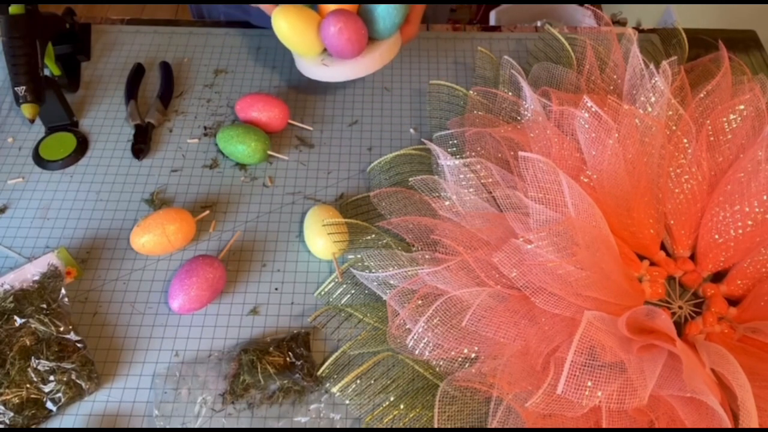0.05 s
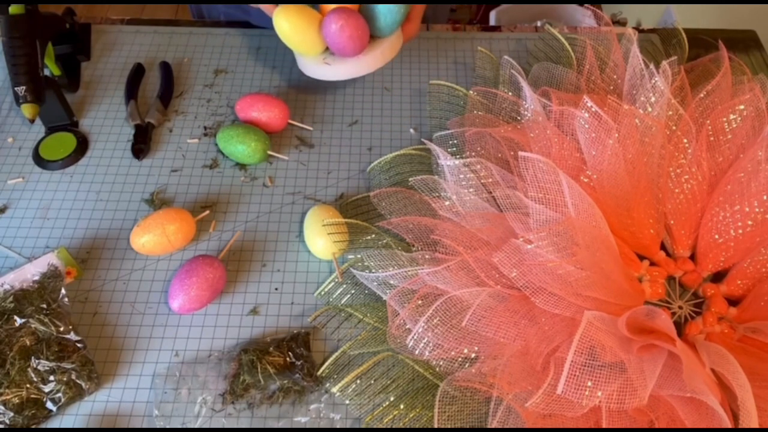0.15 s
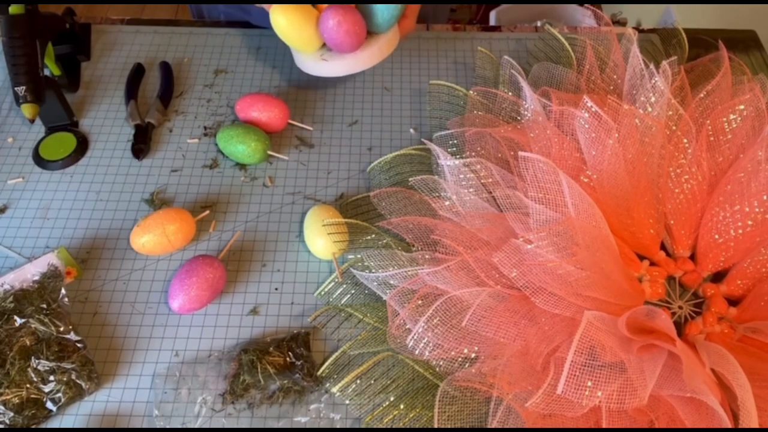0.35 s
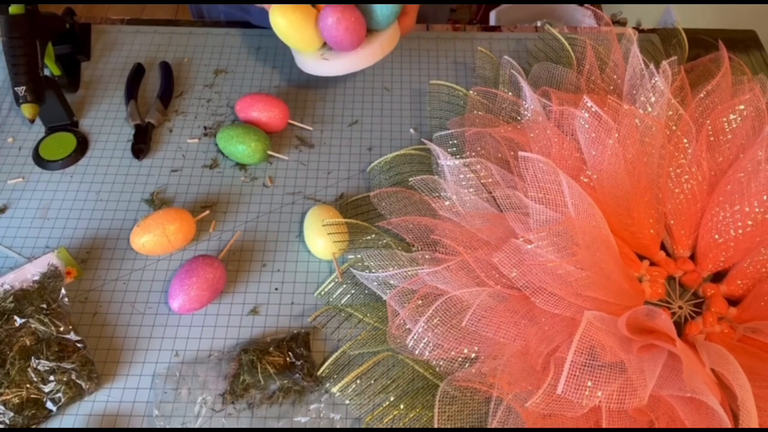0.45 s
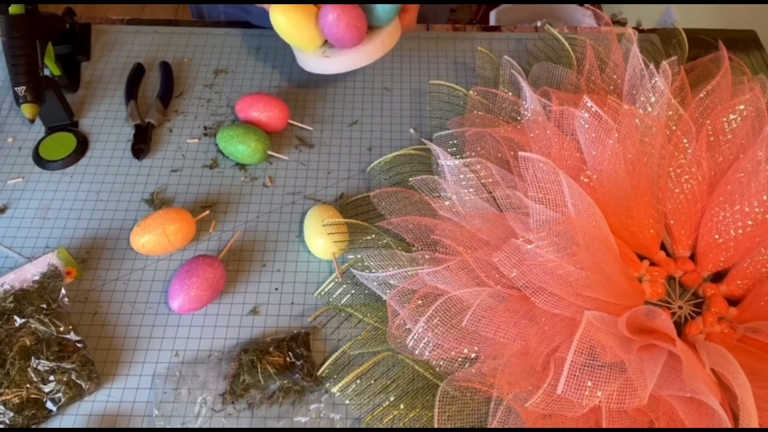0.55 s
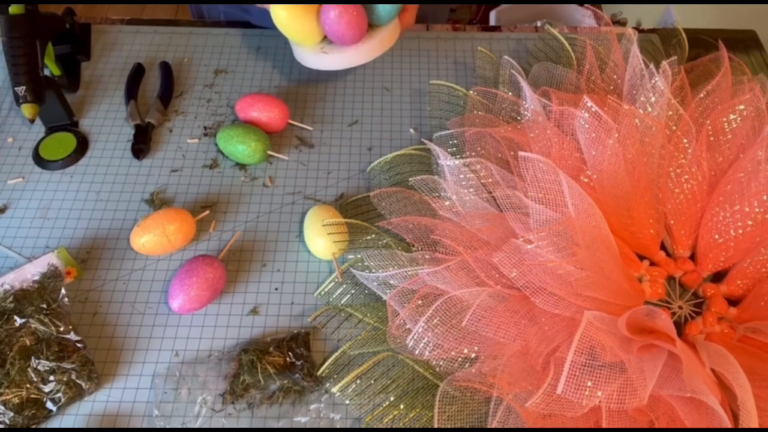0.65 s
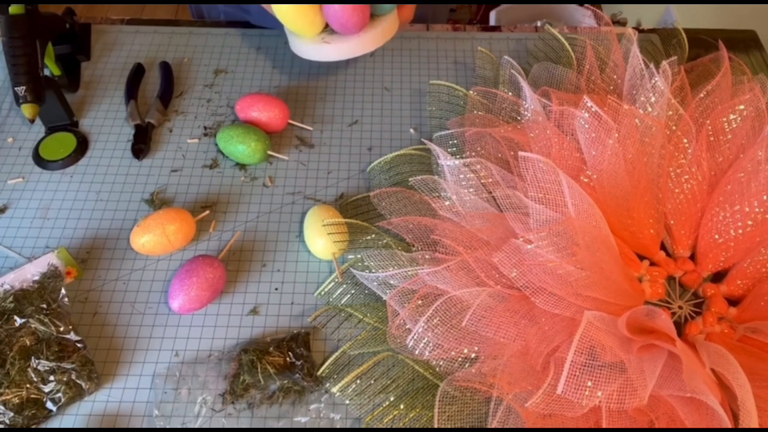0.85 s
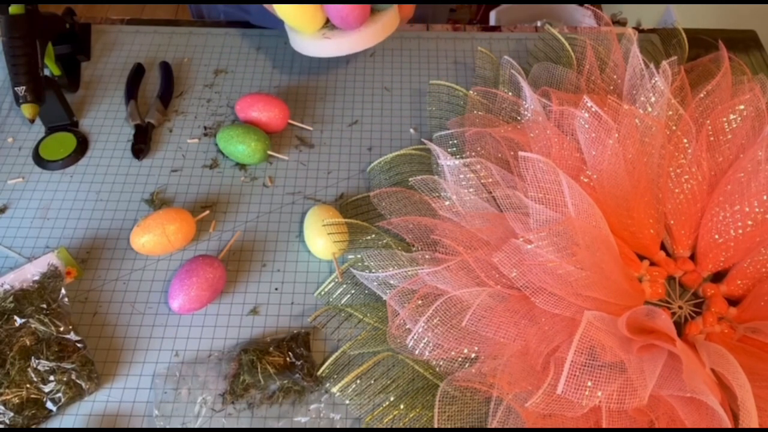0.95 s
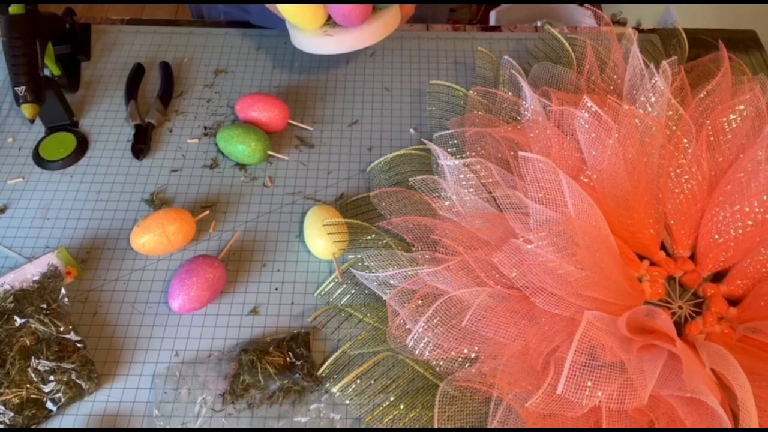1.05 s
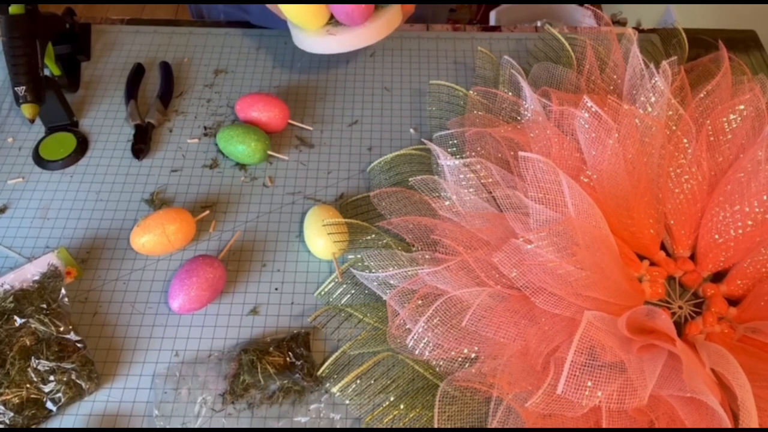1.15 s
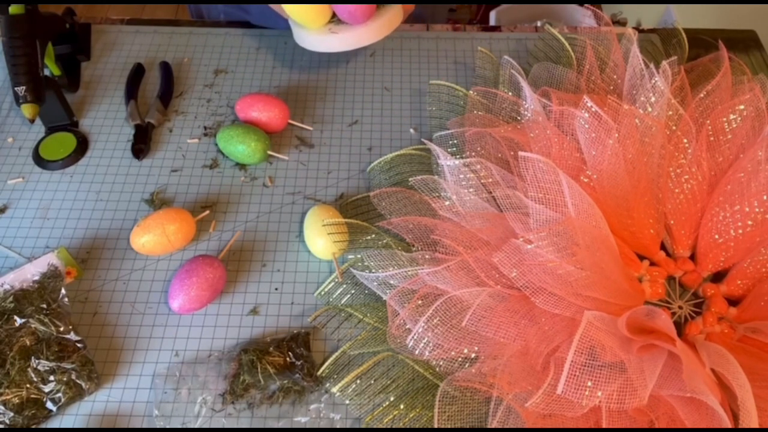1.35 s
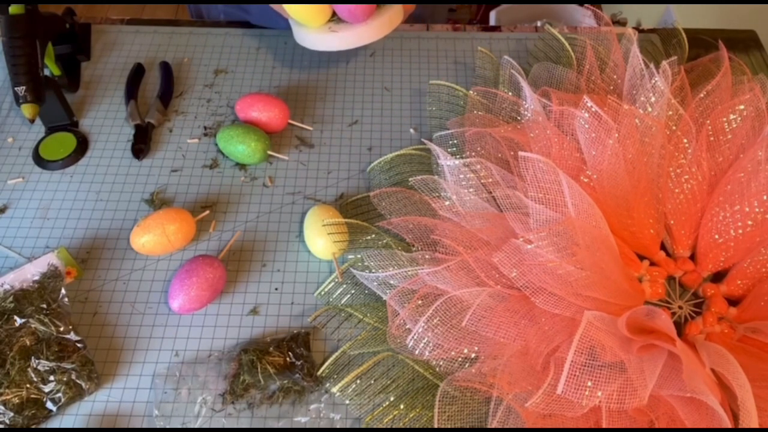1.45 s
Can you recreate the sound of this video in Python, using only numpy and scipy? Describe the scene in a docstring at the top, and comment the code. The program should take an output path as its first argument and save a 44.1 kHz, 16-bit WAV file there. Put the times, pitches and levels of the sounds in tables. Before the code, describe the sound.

Hollow plastic eggs on sticks knock and scrape with faint rustling over a low indoor hum.

```python
"""A small quiet room, where hollow plastic eggs on sticks knock and scrape as their foam ring is handled.
Each knock is stick-slip friction: dense clicks excite shell modes, with a foam thump and contact hiss.
Foam and fingers rustle faintly as clumped grains of sound, also ringing the shells and the foam.
Behind them lie a mains hum of wavering harmonics and a low rumble with faint hiss of shaped noise."""
import sys
import numpy as np
from scipy import signal
from scipy.fft import rfft, irfft
from scipy.io import wavfile
from scipy.ndimage import uniform_filter1d

SR = 44100
rng = np.random.default_rng(int(sys.argv[2]) if len(sys.argv) > 2 else 0)


def wav_record(signal):
    """Record a signal, one row per channel, as 16-bit PCM in the file named by sys.argv[1]."""
    frames = np.transpose(np.atleast_2d(signal))
    bounded = np.clip(frames, -1, 1)
    # unit amplitude maps onto the largest positive 16-bit level
    quanta = np.round(bounded * 32767).astype(np.int16)
    wavfile.write(sys.argv[1], SR, quanta)


N = 66150

# Resonances of the plastic shells: f/Hz, level/dB
SHELL_MODES = [(1400, 1.5), (1600, 3), (1725, 9), (1905, 7), (2120, -3), (2250, 4.5), (2320, -1),
               (2525, 6.5), (2640, 8), (2900, 8.5), (3157, 8.5), (4060, -11), (4210, -2), (4300, -4),
               (4630, -11.5), (6470, -8), (6640, -0.5)]
# Resonances of the foam ring: f/Hz, level/dB
FOAM_MODES = [(172, -2.5), (338, -1), (560, 0), (630, 1.5), (710, 0.5), (810, -0.5), (900, -2)]


def amp(db):
    """Level definition: an amplitude ratio is ten to the power of dB over 20."""
    return 10 ** (np.asarray(db) / 20)


def evened(x):
    """Normalization: division by the root mean square gives unit power."""
    return x / np.sqrt(np.mean(x ** 2) + 1e-20)


def read(points, hz):
    """Logarithmic pitch scale: a curve is interpolated linearly over log frequency."""
    f, value = np.transpose(points)
    return np.interp(np.log(hz + 1), np.log(f + 1), value)


def tinted(x, points):
    """Linear filtering: a spectrum multiplies that of x, at unit power for white input."""
    gain = amp(read(points, np.fft.rfftfreq(N, 1 / SR)))
    return irfft(rfft(x) * evened(gain), N)


def ringing(x, modes):
    """Modal superposition: x excites decaying sines, at unit power for white input."""
    width_hz = 75  # bandwidth of every mode, which sets its decay
    t = np.arange(2000) / SR
    sines = sum(amp(db) * np.sin(2 * np.pi * hz * t) for hz, db in modes)
    impulse_response = np.exp(-np.pi * width_hz * t) * sines
    impulse_response /= np.linalg.norm(impulse_response)
    return signal.oaconvolve(x, impulse_response[None], axes=1)[:, :N]


def sounding(modes):
    """Steady modal sum: sines hold their strengths at random phases, at unit power."""
    hz, db = np.transpose(modes)
    turns = np.outer(hz, np.arange(N) / SR) + rng.random((len(hz), 1))
    return evened(amp(db) @ np.sin(2 * np.pi * turns))


def slips(per_s, spread_db):
    """Stick-slip friction: two independent dense trains of clicks with random size and sign."""
    u = rng.random((N, 2, 3))
    size = amp(spread_db * np.minimum(-np.log(u[..., 0] + 1e-9), 5))
    sign = np.sign(u[..., 1] - .5)
    occurs = u[..., 2] < per_s / SR
    return evened((size * sign * occurs).T)


def wander(top_hz):
    """Random modulation: twelve sines from 1 Hz to top_hz, weaker with frequency, at unit power."""
    t = np.arange(N) / SR
    rates = np.geomspace(1, top_hz, 12)
    return evened(sum(np.sin(2 * np.pi * (f * t + rng.random())) / np.sqrt(f) for f in rates))


def air():
    """Broadband noise: Gaussian noise shaped into the low rumble and faint hiss of the room."""
    # Noise spectrum of the room: f/Hz, density/dB per Hz (relative)
    air_spectrum = [(20, -21), (45, -10), (70, 0.5), (95, 6.5), (140, -12), (260, -21.5), (600, -30),
                    (1200, -39), (5000, -55.5), (10000, -38), (16000, -46)]
    level_db = -61.5
    return amp(level_db) * tinted(rng.standard_normal((2, N)), air_spectrum)


def hum():
    """Harmonic series: a mains-driven tone and its multiples waver in level and phase."""
    # Harmonics from the fundamental up: level/dB (before waver and lean)
    harmonic_db = [-48, -68.5, -69, -80.5]
    hum_hz, lean_db = 58.7, -3.4  # lean: left minus right
    waver_db, waver_turns = 0.36, 0.0095  # rms at the fundamental, growing with harmonic number
    t = np.arange(N) / SR
    tone = 0
    for number, db in enumerate(harmonic_db, 1):
        level = np.sqrt(2) * amp(db + waver_db * number * wander(24))
        turns = number * (hum_hz * t + waver_turns * wander(20)) + rng.random()
        tone = tone + level * np.sin(2 * np.pi * turns)
    return tone * amp(.5 * lean_db * np.array([[1], [-1]]))


def rustle():
    """Granular friction: clumped fine grains of foam and fingers faintly ring shells and foam."""
    # Course of the handling: t/s, grain level/dB, gain of the treble/dB
    handling = [(0, -58, -5), (0.042, -72.5, 8.5), (0.065, -60.5, 4.5), (0.101, -73.5, 11),
                (0.134, -69, 14), (.17, -62, 0.5), (.255, -43.5, 5), (0.308, -51.5, 0), (0.383, -43, 0),
                (0.454, -54.5, 6.5), (0.531, -68.5, 3.5), (0.563, -48.5, -0.5), (0.648, -45, 5.5),
                (0.698, -52.5, -4), (0.746, -48, 3.5), (.79, -49.5, -0.5), (.83, -59, 0),
                (0.865, -78.5, 22.5), (0.954, -84.5, 18.5), (1.002, -45, 7), (1.09, -50, 4.5),
                (1.138, -65, 11), (1.181, -57, 6), (1.209, -46.5, -0.5), (1.268, -45.5, 6.5),
                (1.34, -70.5, 6.5), (1.441, -87, -3.5), (1.5, -71.5, 5.5)]
    # Spectrum of the grains: f/Hz, density/dB per Hz (relative)
    grain_spectrum = [(120, -46), (300, -7), (700, 5), (1050, -5), (2500, 0), (4000, -3.5), (7000, -4),
                      (11000, -9), (16000, -12.5)]
    grains_per_s, grain_spread_db, clump_db = 3500, 3., 1.5
    ring_db, treble_hz = -13.5, 6050
    s, db, treble_db = np.transpose(handling)
    t = np.arange(N) / SR
    drive = slips(grains_per_s, grain_spread_db) * amp(np.interp(t, s, db) + clump_db * wander(72))
    resonance = ringing(drive, SHELL_MODES + FOAM_MODES)
    whole = tinted(drive, grain_spectrum) + amp(ring_db) * resonance
    low = signal.sosfiltfilt(signal.butter(2, treble_hz, fs=SR, output="sos"), whole)
    treble = whole - low
    return low + amp(np.interp(t, s, treble_db)) * treble


def knock(train, s, db, rise, fall, focus_hz, high_db, thump_db, treble_db, top_db, clear_db, scrape_db):
    """Excitation and resonance: a swelling, dying flurry of slips rings shells and foam, and hisses."""
    # Brief changes of force inside the knocks: t/s, change/dB (positive louder, negative softer)
    changes = [(0.212, -0.5), (0.2232, 1), (0.345, -2), (0.355, -1.5), (0.3613, -1.5), (1.046, -1.5),
               (1.2331, 3.5)]
    # Scrape at the contact: f/Hz, density/dB per Hz (relative)
    scrape_spectrum = [(1300, -23.5), (2000, 7.5), (3500, 3.5), (7000, -2.5), (9000, -14.5)]
    # Treble of the contacts: f/Hz, density/dB per Hz (relative)
    contact_spectrum = [(6000, -22), (8000, 1), (13000, -7.5), (16000, -6)]
    crest_s, change_s, thump_lag_s = 0.0098, 0.0018, 0.0017
    clear_sharpness, thump_sharpness = 2.72, 1.27  # these swell and die faster than the slips
    focus_octaves, high_hz, top_hz = 0.71, 3500, 5000
    deepen, loud_db = 0.97, -27  # lowest foam mode: dB per dB of knock level relative to loud_db

    t = np.arange(N) / SR - s
    # distance below the peak: straight slopes in dB with a rounded crest
    below_db = np.where(t < 0, rise, fall) * (np.hypot(t, crest_s) - crest_s)

    foam = [(hz, g + deepen * (db - loud_db) * (k == 0)) for k, (hz, g) in enumerate(FOAM_MODES)]
    late_below_db = np.interp(t - thump_lag_s, t, below_db)
    thump = amp(db + thump_db - thump_sharpness * late_below_db) * sounding(foam)

    for at, change_db in changes:
        below_db = below_db - change_db * np.exp(-((t + s - at) / change_s) ** 2)
    drive = train * amp(db - below_db)

    def mode_gain_db(hz):
        """Selective excitation: modes lose strength away from the focus; upper ones are set apart."""
        if hz > top_hz:
            return top_db
        if hz > high_hz:
            return high_db
        return -6 * (np.log2(hz / focus_hz) / focus_octaves) ** 2

    shells = [(hz, g + mode_gain_db(hz)) for hz, g in SHELL_MODES]
    clear_ring = amp(db + clear_db - clear_sharpness * below_db) * sounding(shells)
    scrape = amp(scrape_db) * tinted(drive, scrape_spectrum)
    contact_hiss = amp(treble_db) * tinted(drive, contact_spectrum)
    return ringing(drive, shells) + clear_ring + thump + scrape + contact_hiss


def room(x):
    """Reverberation: convolution with a noise tail whose bands decay at their own rates."""
    # Reverberation time of the room: f/Hz, T60/s
    decay_times = [(250, .24), (2500, .2), (12000, .1)]
    hz, t, z = signal.stft(rng.standard_normal((2, SR // 2)), SR, nperseg=256)
    decay = amp(-60 * t / read(decay_times, hz)[:, None])
    tail = signal.istft(z * decay, SR, nperseg=256)[1]
    tail[:, :300] = 0  # gap in samples before the tail
    return signal.fftconvolve(x, tail / np.linalg.norm(tail[0]), axes=1)[:, :N]


def patchy(x):
    """Spectral modulation: the colour shifts in small patches as the points of contact move."""
    patch_db = 2.5  # rms
    z = signal.stft(x, nperseg=256)[2]
    field = rng.standard_normal(z.shape[1:])
    for axis in (0, 1):  # smooth over frequency, then time
        field = uniform_filter1d(field, size=4, axis=axis)
    return signal.istft(z * amp(patch_db * evened(field)), nperseg=256)[1][:, :N]


def over_table(x):
    """Transmission: the way over the table weakens some frequencies more than others."""
    # Gain of the way over the table: f/Hz, gain/dB
    table_gain = [(60, -26), (140, -6.5), (300, -6.5), (950, -6), (1150, -12), (1400, -2)]
    return irfft(rfft(x) * amp(read(table_gain, np.fft.rfftfreq(N, 1 / SR))), N)


def ports(pair):
    """Interchannel coherence: two microphone ports partly agree, with phase and level differences."""
    # Phase by which left leads: f/Hz, phase/rad
    left_lead = [(200, 0), (400, -.4), (600, -3.1), (850, -5.9), (2500, -6.7), (6800, -6.3), (7800, -3.3),
                 (9500, -3.1), (10200, -.1), (12900, 0), (13500, 3.1), (15400, 6.2)]
    # Left minus right: f/Hz, level difference/dB
    left_lean = [(180, -3), (550, -5), (1650, 0.5), (4970, -1), (15000, 0)]
    # Left-right likeness before lead and lean: f/Hz, coherence/1
    likeness = [(60, .995), (300, .8), (700, .72), (1500, .8), (3000, .68), (7000, .68), (8200, .96),
                (13500, .97), (16000, .95)]
    hz = np.fft.rfftfreq(N, 1 / SR)
    a, b = rfft(pair)
    same = read(likeness, hz)
    half = np.exp(.5j * read(left_lead, hz)) * amp(.5 * read(left_lean, hz))
    left = a * half
    right = (same * a + np.sqrt(1 - same ** 2) * b) / half
    return irfft(np.array([left, right]), N)


def scene():
    """Superposition: knocks with reverberation and rustle add to air and hum."""
    # Knocks: peak t/s, level/dB, rise/dB per s, fall/dB per s, best-rung f/Hz, upper modes/dB,
    # thump/dB, treble/dB, top modes/dB, clear ring/dB, scrape/dB (part levels relative to the knock)
    knock_table = [(0.224, -30, 1258, 998, 2000, 2, -7, 1.5, -2.5, -7.5, 1),
                   (0.352, -29.5, 1253, 950, 1800, 1.5, -9.5, 1.5, -32.5, -6.5, 1),
                   (0.599, -24, 1293.5, 885, 2567, 0.5, -4.5, -4, 5, -2, 0),
                   (0.768, -48.5, 699, 509, 1810, 4.5, -5, -3.5, 0.5, -18, -5),
                   (1.035, -36.5, 607, 620, 1450, -2.5, -6.5, 1, 3, -9, 0.5),
                   (1.233, -33.5, 1583, 1203, 1730, 10, -7, 3, 4, 0, 0.5)]
    room_db = -15
    train = slips(per_s=4300, spread_db=2)
    knocks = sum(knock(train, *row) for row in knock_table)
    handling = patchy(knocks + amp(room_db) * room(knocks) + rustle())
    return ports(over_table(handling) + air()) + hum()


def record(dry):
    """Band limitation: a linear-phase low-pass filter removes the highest treble."""
    edge_hz = 15900
    taps = signal.firwin(511, edge_hz, window=("kaiser", 9), fs=SR)
    return signal.oaconvolve(dry, taps[None], "same")


dry = scene()
out = record(dry)
wav_record(out)
```